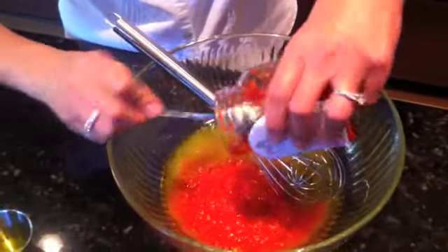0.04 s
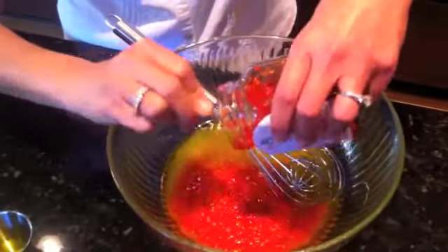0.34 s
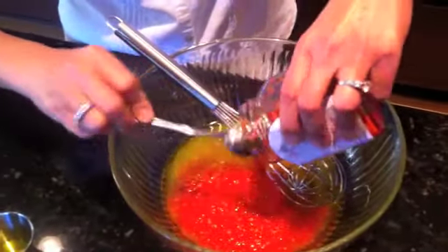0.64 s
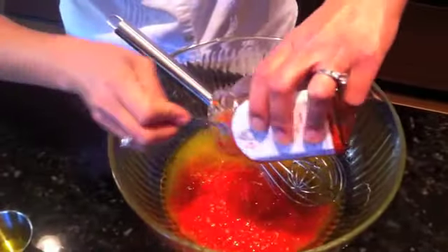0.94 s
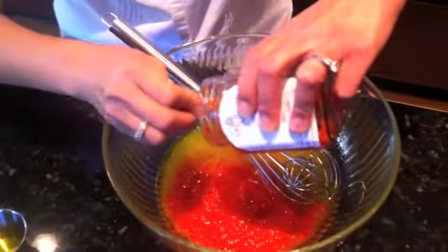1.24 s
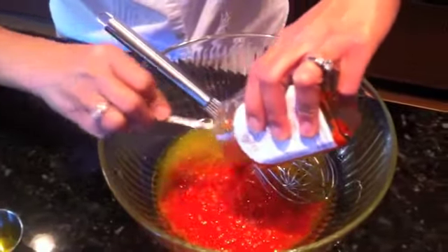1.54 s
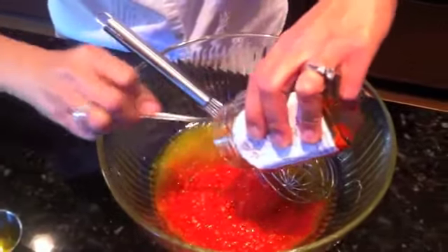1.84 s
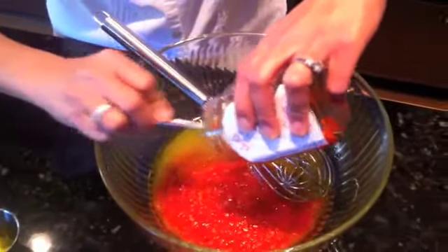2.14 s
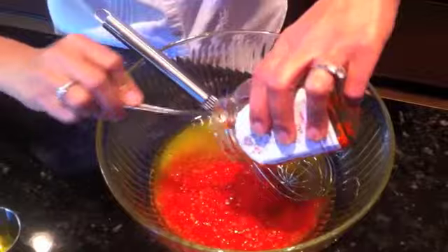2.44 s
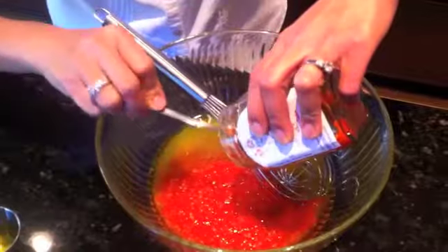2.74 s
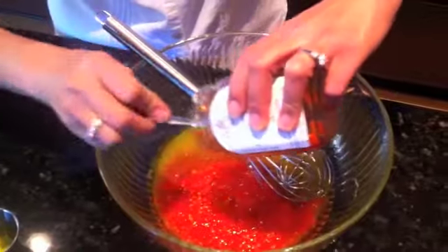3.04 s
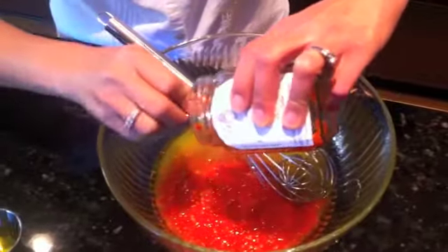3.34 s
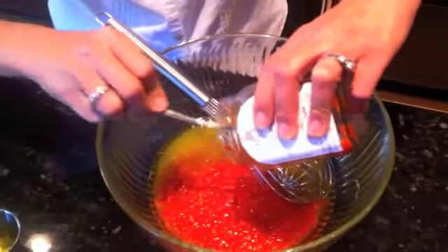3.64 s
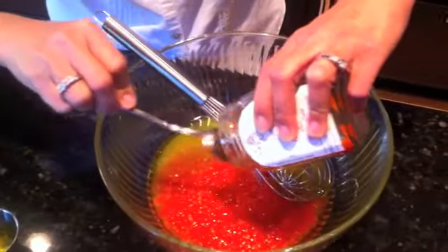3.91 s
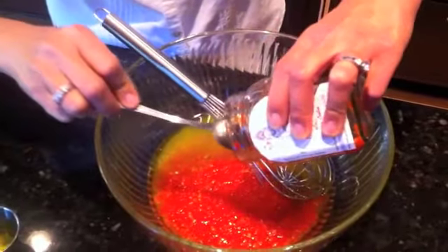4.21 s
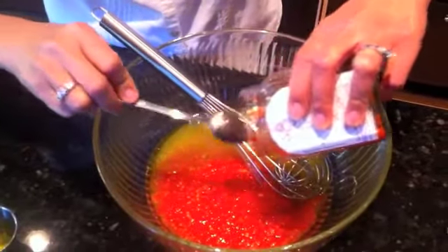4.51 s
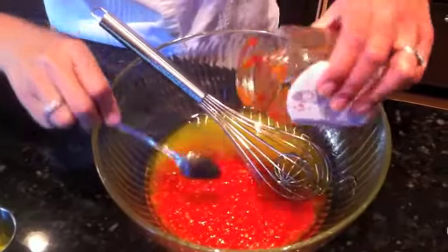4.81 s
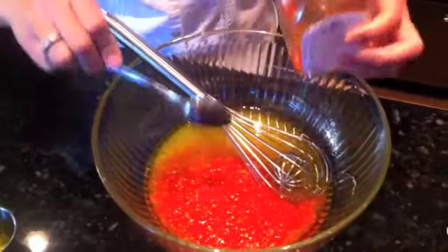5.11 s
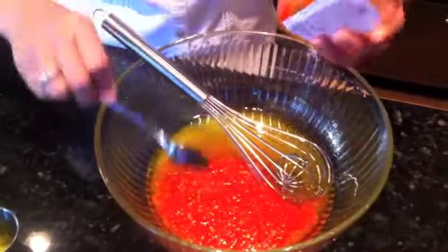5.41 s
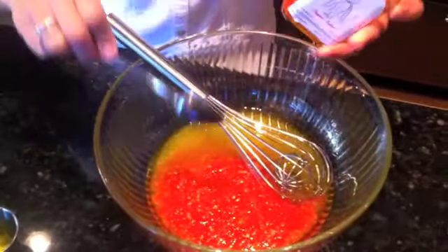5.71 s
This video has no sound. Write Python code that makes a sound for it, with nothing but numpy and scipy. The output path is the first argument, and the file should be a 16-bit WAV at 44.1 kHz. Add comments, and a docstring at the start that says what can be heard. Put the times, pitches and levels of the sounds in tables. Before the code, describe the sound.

Light, irregular clinks and tiny scrapes of a spoon scooping wet relish from a glass jar, then quiet room hush.

```python
"""A metal spoon clinks, chatters and scrapes in a small glass jar, scooping wet relish over a bowl.
Each impact excites the damped normal modes of spoon and glass and the air resonance of jar and bowl;
sliding friction drives the same solid modes. The hand damps the jar, whose note rises as it empties.
Films of sauce snap in short wet ticks, and the quiet kitchen adds a bright reverberant tail
over a steady low hush and one faint swell of rumble."""
import sys
import numpy as np
from scipy import signal
from scipy.fft import rfft, irfft, next_fast_len
from scipy.io import wavfile

SR = 44100
rng = np.random.default_rng(int(sys.argv[2]) if len(sys.argv) > 2 else 0)


def digitize_waveform(pressure):
    """Quantize a signal to 16-bit integers and store it at the path in sys.argv[1].

    Rows of a 2-D input are taken as channels; values are limited to [-1, 1].
    """
    field = np.atleast_2d(pressure).T
    bounded = np.clip(field, -1, 1)
    quanta = np.round(bounded * 32767).astype(np.int16)
    wavfile.write(sys.argv[1], SR, quanta)


N = 253989
RING_SIZE, ATTACK_SIZE = SR // 4, SR // 50

# Normal modes of spoon and jar together. Each row: frequency in Hz, gain in dB, decay time T60 in seconds.
BODY_MODES = [(1990, -5, 0.01), (2150, -13, 0.075), (2360, -9, 0.02), (2866, -25, 0.13), (3560, 0.5, 0.072),
              (3880, 11.5, 0.012), (4170, 2, .025), (4850, -4.5, 0.1), (4730, -2.5, 0.065),
              (5380, 1, 0.044), (6030, -4, 0.12), (6430, 8, 0.0098), (6830, -2.5, 0.047), (6610, 8, 0.051),
              (7120, 4.5, 0.015), (7145, -47, 0.0096), (8560, 6, 0.029), (8980, 4, 0.029),
              (9550, -8, 0.0067), (9800, 1.5, 0.072), (10970, 1.5, 0.047), (11220, -5, .02),
              (11870, -6.5, 0.025), (12280, 1.5, 0.064), (12500, -5, 0.015), (13300, -9, 0.018),
              (14000, -4.5, 0.022), (14600, -8.5, 0.014), (15000, -3.5, 0.015)]
# Scrapes of the spoon over the glass; the first row is the faint dying ring of a clink. Each row: start in
# seconds, length in seconds, level in dB, the note that sings out in Hz (mostly the wall note, once its
# overtone), its level over the other modes in dB.
SCRAPES_AND_RING = [(0.0, .041, -73, 3480, 0.5), (0.349, .018, -47.5, 3560, 1),
                    (0.594, .039, -45.5, 4850, 1.5), (0.668, .022, -54.5, 3660, 11),
                    (0.807, .046, -51.5, 3656, 6), (1.298, .02, -67, 3780, -13),
                    (1.629, .045, -69.5, 3620, -6), (1.856, .054, -49, 3680, 5.5),
                    (2.531, .008, -49, 3660, 4.5), (2.778, .025, -44, 3940, -2.5),
                    (2.798, .012, -40.5, 3952, 5.5), (3.564, .014, -67.5, 3700, -19),
                    (3.95, .024, -52, 3970, 1.5), (4.549, .037, -56.5, 3960, -2),
                    (4.59, .033, -51, 3874, 31)]
# Spectrum of the dry knock and rasp of contact. Each row: frequency in Hz, gain in dB.
CONTACT_SPECTRUM = [(30, -24), (250, -17), (500, -6.5), (800, 2), (1200, 4), (1600, 7), (3000, 8.5),
                    (8000, -6), (16000, -3.5)]
# Reverberation of the kitchen. Each row: frequency in Hz, T60 in seconds.
ROOM_DECAY = [(300, 0.61), (2000, 0.51), (4000, 0.43), (7000, 0.27), (11000, .31), (16000, 0.23)]
# Background noise. Each row: frequency in Hz, relative spectral density in dB.
HUSH_SPECTRUM = [(30, -31), (60, -23), (100, -14), (130, 1.5), (200, -1.5), (400, -3), (550, -6),
                 (750, -13), (1300, -18), (2500, -24), (5000, -25), (10000, -28.5), (16000, -27.5)]
# Blows of spoon on glass. Each row: start in seconds, chatter time in seconds, wall note in Hz,
# chime in Hz, then strength, hardness, place, spoon-note offset and air offset, all in dB.
# A positive place favours the high chime, a negative one the wall note.
BLOWS = [(0.2336, 0.0022, 3470, 6150, -45.5, 3.5, 7, -11.5, -35.5),
         (0.31, 0.0065, 3463, 6240, -37.5, -.5, 6.5, -11.5, -20.5),
         (0.4487, .0018, 3550, 6180, -37.5, 1.5, 5.5, 5.5, -30),
         (0.7931, 0.0029, 3635, 6360, -59, 0, -2.5, -0.5, 0.5),
         (0.9308, .0028, 3676, 6170, -48, 0.5, -7.5, -20, -19),
         (0.9892, 0.0042, 3666, 6320, -46.5, 0, -1, -14, -22),
         (1.116, .0005, 3710, 7160, -45, 6.5, 5.5, -3, -11.5),
         (1.201, .0055, 3620, 6120, -51, -4.5, -1, -12, -15),
         (1.3565, .0024, 3466, 5840, -54.5, 3, -3.5, -15, -16),
         (1.6471, 0.0026, 3530, 6260, -66, 0.5, 1.5, -11, -3),
         (1.8115, 0.0025, 3615, 6750, -41.5, 1.5, -7, -16, -9),
         (2.0535, 0.0019, 3627, 6470, -37, 9, 2, -9, -41.5),
         (2.1794, .0026, 3880, 6260, -45.5, 1, 0, 8.5, -26),
         (2.2623, 0.0013, 3697, 6580, -36, 5, -5.5, -17, -15),
         (2.508, 0.00075, 3710, 6630, -44, -1.5, -5.5, -25.5, -15),
         (2.6039, .006, 3700, 6330, -44.5, -7.5, -6, -10.5, -23),
         (2.655, 0.0032, 3870, 6500, -44.5, -4, 4, -2.5, -21),
         (2.7542, 0.001, 3800, 6450, -60, -11.5, -3, -3.5, -11.5),
         (2.9897, 0.00098, 3830, 6280, -46.5, -0.5, 2.5, -10.5, -16.5),
         (3.0377, 0.0018, 3736, 6340, -48, -4, -5, -7.5, -23),
         (3.1336, 0.00085, 3725, 6280, -35, -3, 8.5, -20.5, -39.5),
         (3.2125, 0.0013, 3660, 7530, -47.5, 6.5, 5, -7.5, -12.5),
         (3.3254, 0.00076, 3880, 6400, -41.5, 3, 3, -8.5, -15.5),
         (3.7506, .0008, 3760, 6950, -56, 2, -4.5, -15.5, -8),
         (4.373, 0.0017, 3758, 6430, -45.5, -5.5, -3.5, -18, -26.5),
         (4.5839, .0052, 3920, 6650, -59, -4.5, -7.5, -2, -25)]
# Registers of the ring: spoon note, wall note, its overtone, chime, two top overtones.
# Each row: offset from strength in dB, share of hardness, share of place, base lead of the main note
# over the other modes in dB, its T60 in seconds, its fractional pitch scatter from blow to blow.
RING_REGISTERS = [(-1, 0, 0, 8, 0.022, .004), (6, -.78, -.53, 8, .045, 0.0012),
                  (1, -0.37, -0.32, 2.5, .032, .008), (6.5, 0, 1, -1, .03, 0.0002),
                  (3, .6, -0.032, -3.5, .028, 0.035), (-2, 0.88, -0.13, -5, .022, .025)]
# Boundaries of the six registers in Hz, from low to high.
EDGES_HZ = [1700, 3050, 4400, 5600, 7900, 11000, 16500]
# Air resonances of jar and bowl. Each row: frequency in Hz, gain in dB, T60 in seconds.
CAVITY_MODES = [(540, -2, 0.12), (603, 2, 0.092), (647, 1.5, 0.13)]
# Sticky relish parting from the spoon. Each row: start in seconds, peak level in dB.
SNAPS = [(0.7612, -32), (1.7009, -33.5), (4.0680, -38.5)]
# Spectrum of a snapping film. Each row: frequency in Hz, gain in dB.
SNAP_SPECTRUM = [(1000, -16.5), (3000, -18.5), (4400, -3.5), (5600, 4.5), (7500, -11), (9200, -3.5),
                 (12000, -6), (16000, -7.5)]


def from_db(db):
    """Amplitude grows tenfold with every 20 dB."""
    return 10 ** (np.asarray(db) / 20)


def rms(x):
    """Effective amplitude is the root of the mean square."""
    return np.sqrt(np.mean(x ** 2) + 1e-24)


def at_level(x, db):
    """Normalisation sets the RMS level of the first 20 ms."""
    return x * from_db(db) / rms(x[:ATTACK_SIZE])


def at_hz(points, hz):
    """Interpolation reads a table on a log-frequency axis."""
    known_hz, values = np.transpose(points)
    return np.interp(np.log(np.maximum(hz, 1)), np.log(known_hz), values)


def add(track, start_s, sound):
    """Superposition: a sound adds to the track from its start time."""
    start = int(round(start_s * SR))
    track[start:start + len(sound)] += sound[:N - start]


def band(x, low_hz, high_hz):
    """A band-pass filter attenuates what lies outside its edges."""
    return signal.sosfilt(signal.butter(2, [low_hz, high_hz], "band", fs=SR, output="sos"), x + 1e-18)


def coloured(x, spectrum):
    """A minimum-phase filter shapes the spectrum causally, so nothing comes early."""
    size = 2 * next_fast_len(len(x))
    hz = np.arange(size // 2 + 1) * SR / size
    cepstrum = irfft(np.log(from_db(at_hz(spectrum, hz))))
    cepstrum[1:size // 2] *= 2
    cepstrum[size // 2 + 1:] = 0
    return irfft(rfft(x, size) * np.exp(rfft(cepstrum)))[:len(x)]


def ring(force, hz, t60):
    """A mode responds as a damped oscillator and radiates nothing at zero frequency."""
    radius = from_db(-60 / (max(t60, .002) * SR))
    angle = 2 * np.pi * hz / SR
    return signal.lfilter([.5, 0, -.5], [1, -2 * radius * np.cos(angle), radius ** 2], force + 1e-18)


def body_modes(force, spread_db, detune):
    """Modal response of spoon and jar: each mode's strength, sign and pitch vary with touch and grip."""
    chance = rng.standard_normal((len(BODY_MODES), 3))
    return np.array([
        np.sign(sign) * from_db(db + spread_db * strength) * ring(force, hz * (1 + detune * shift), t60)
        for (strength, sign, shift), (hz, db, t60) in zip(chance, BODY_MODES)])


def scrapes(slips_per_s, slip_spread_db, wall_t60, rasp_db):
    """Stick-slip friction keeps the modes ringing; the first, faint event is a clink's dying ring."""
    out, t = np.zeros(N), np.arange(RING_SIZE) / SR
    usual_top_hz, usual_db, db_per_octave = 6500, -48, 24.5
    for start_s, length_s, level_db, wall_hz, wall_db in SCRAPES_AND_RING:
        # food cushions the edge; pressing harder cuts through it and brightens the scrape
        top_hz = usual_top_hz * 2 ** ((level_db - usual_db) / db_per_octave)
        envelope = np.sqrt(np.maximum(np.sin(np.pi * np.minimum(t / length_s, 1)), 0))
        slipping = rng.random(RING_SIZE) < slips_per_s / SR
        slips = slipping * from_db(slip_spread_db * rng.standard_normal(RING_SIZE))
        slips *= rng.choice([-1, 1], RING_SIZE)
        force = band(envelope * slips, 1100, np.clip(top_hz, SR / 20, SR / 3))
        body = body_modes(force, spread_db=1.5, detune=.015).sum(axis=0)
        wall = ring(force, wall_hz, wall_t60)
        rasp = coloured(force, CONTACT_SPECTRUM)
        sound = body / rms(body) + from_db(wall_db) * wall / rms(wall)
        sound += from_db(rasp_db) * rasp / rms(rasp)
        add(out, start_s, sound * from_db(level_db) / rms(sound[:int(length_s * SR)]))
    return out


def kitchen(direct, wet_db, build_s):
    """Reverberation: a diffuse field builds behind the direct sound and dies sooner in the treble."""
    t = np.arange(SR * 3 // 4) / SR
    hz = np.arange(len(t) // 2 + 1) * SR / len(t)
    noise_spectrum = rfft(rng.standard_normal(len(t)))
    tail = np.zeros(len(t))
    for centre_hz, t60 in ROOM_DECAY:
        share = at_hz([(f, f == centre_hz) for f, _ in ROOM_DECAY], hz)
        tail += irfft(noise_spectrum * share, len(t)) * from_db(-60 * t / t60)
    tail *= 1 - np.exp(-(t / build_s) ** 2)
    return direct + from_db(wet_db) * signal.fftconvolve(direct, tail / np.linalg.norm(tail))[:N]


def hush(level_db):
    """Stationary noise, strongest at low frequencies, forms the room's background."""
    noise = coloured(rng.standard_normal(N + RING_SIZE), HUSH_SPECTRUM)[RING_SIZE:]
    return from_db(level_db) * noise / rms(noise)


def contact(chatter_s, touch_db, rebound_db, grit_db, rebounds=5):
    """Impact force: a first impulse, quick rebounds and the grit of metal sliding between them."""
    t = np.arange(RING_SIZE) / SR
    grit = rng.standard_normal(RING_SIZE) * np.exp(-(t / (2 * chatter_s)) ** 2)
    force = from_db(grit_db) * grit / np.linalg.norm(grit)
    lags_s = chatter_s * (np.arange(rebounds) + rng.uniform(.46, 1.5, rebounds)) * 1.4 / rebounds
    force[(lags_s * SR).astype(int)] += from_db(rebound_db) * rng.normal(0, 1, rebounds)
    force[0] += from_db(touch_db)
    return force


def near_echoes(force, echo_db, echo_t60):
    """Early reflections inside jar and bowl are new for each blow because the jar keeps moving."""
    t = np.arange(RING_SIZE) / SR
    echoes = rng.standard_normal(RING_SIZE) * from_db(-60 * t / echo_t60)
    echoes /= np.linalg.norm(echoes)
    return force + from_db(echo_db) * signal.fftconvolve(force, echoes)[:RING_SIZE]


def register_notes(wall_hz, chime_hz, spoon_db):
    """Each register has one main natural frequency, scattered a little from blow to blow."""
    spoon_hz = 2135 - 22 * min(spoon_db, 0)   # pressed to the wall, the spoon rings weaker and higher
    overtone_hz, top_hz = 1.4 * wall_hz, [9645, 12330]
    hz = np.array([spoon_hz, wall_hz, overtone_hz, chime_hz, *top_hz])
    scatter = np.transpose(RING_REGISTERS)[-1]
    return hz * (1 + scatter * rng.standard_normal(len(hz)))


def register_levels(strength_db, hardness_db, place_db, spoon_db):
    """Contact hardness tilts the spectrum; the striking point trades wall note against chime."""
    base_db, hardness_share, place_share = np.transpose(RING_REGISTERS)[:3]
    levels_db = strength_db + base_db + hardness_db * hardness_share + place_db * place_share
    levels_db[0] += spoon_db
    return levels_db


def knock(force, strength_db, hardness_db):
    """The non-resonant part of an impact grows more slowly than the ring and is stronger in soft blows."""
    usual_knock_db, usual_strength_db = -52.5, -45.5
    level_db = usual_knock_db + .82 * (strength_db - usual_strength_db) - .2 * hardness_db
    return at_level(coloured(force, CONTACT_SPECTRUM), level_db)


def air_pop(force, level_db):
    """Cavity resonance: the air in jar and bowl answers a blow with a hollow pop."""
    air = sum(rng.choice([-1, 1]) * from_db(db) * ring(force, hz, t60) for hz, db, t60 in CAVITY_MODES)
    return at_level(band(air, 420, 720), level_db)


def clinks(clarity, clack_db, clack_rise_s, clack_t60, ring_gain_db, air_gain_db):
    """Impact excitation: each blow gives free vibration in six registers, a knock and a pop of air."""
    out, t = np.zeros(N), np.arange(RING_SIZE) / SR
    mode_register = np.digitize([hz for hz, _, _ in BODY_MODES], EDGES_HZ) - 1
    for start_s, chatter_s, wall_hz, chime_hz, *blow_db in BLOWS:
        strength_db, hardness_db, place_db, spoon_db, air_db = blow_db
        notes_hz = register_notes(wall_hz, chime_hz, spoon_db)
        levels_db = register_levels(strength_db, hardness_db, place_db, spoon_db)
        touch = contact(chatter_s, touch_db=-5, rebound_db=-8.5, grit_db=2.5)
        force = near_echoes(touch, echo_db=-12, echo_t60=.035)
        modes = body_modes(force, spread_db=1, detune=.009)
        # countless heavily damped modes merge into a clack
        clack = rng.standard_normal(RING_SIZE) * (1 - np.exp(-t / clack_rise_s))
        clack *= from_db(-60 * t / (clack_t60 + 2 * chatter_s))
        for k, (*_, lead_db, t60, _) in enumerate(RING_REGISTERS):
            edges_hz = EDGES_HZ[k:k + 2]
            # a note struck at its antinode stands out of the blow, and so rings clearer
            prominence_db = clarity * (levels_db[k] - np.mean(levels_db))
            note = at_level(ring(touch, notes_hz[k], t60), lead_db + prominence_db)
            others = at_level(modes[mode_register == k].sum(axis=0), 0)
            others += at_level(band(clack, *edges_hz), clack_db)
            add(out, start_s, at_level(band(note + others, *edges_hz), levels_db[k] + ring_gain_db))
        add(out, start_s, knock(force, strength_db, hardness_db))
        add(out, start_s, air_pop(force, strength_db + air_db + air_gain_db))
    return out


def ticks(decay_s):
    """The rupture of a sauce film is a broadband transient: a bright click with no ring."""
    out, t = np.zeros(N), np.arange(ATTACK_SIZE) / SR
    for start_s, peak_db in SNAPS:
        burst = rng.standard_normal(ATTACK_SIZE) * np.exp(-t / decay_s)
        snap = coloured(burst, SNAP_SPECTRUM)
        add(out, start_s, from_db(peak_db) * snap / np.max(np.abs(snap)))
    return out


def rumble(low_hz, high_hz, level_db, peak_s, rise_s, fall_s):
    """Low narrow-band noise under an exponential envelope swells quickly and sinks slowly."""
    noise = band(rng.standard_normal(N), low_hz, high_hz)
    since_peak_s = np.arange(N) / SR - peak_s
    swell = np.exp(np.minimum(since_peak_s / rise_s, -since_peak_s / fall_s))
    return from_db(level_db) * swell * noise / rms(noise)


def scene():
    """Close to the jar, direct sound dominates; reverberation and background noise add to it."""
    spoon = clinks(clarity=.75, clack_db=-6, clack_rise_s=.001, clack_t60=.05,
                   ring_gain_db=-.76, air_gain_db=-4.5)
    spoon += scrapes(slips_per_s=1400, slip_spread_db=4.5, wall_t60=.06, rasp_db=-10)
    spoon += ticks(decay_s=.002)
    room = kitchen(spoon, wet_db=-12, build_s=.0028)
    room += hush(level_db=-66)
    room += rumble(low_hz=135, high_hz=210, level_db=-68, peak_s=1.15, rise_s=.24, fall_s=1)
    return room[None]


def record(dry):
    """A steep elliptic low-pass filter limits the bandwidth."""
    cutoff_hz = 16200
    return signal.sosfilt(signal.ellip(10, .2, 70, cutoff_hz, fs=SR, output="sos"), dry)


dry = scene()
out = record(dry)
digitize_waveform(out)
```